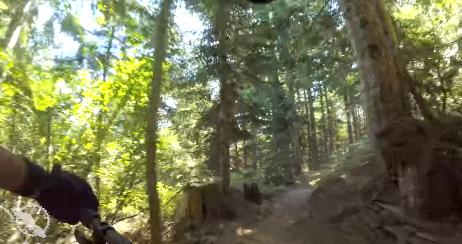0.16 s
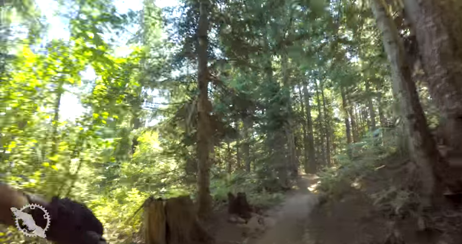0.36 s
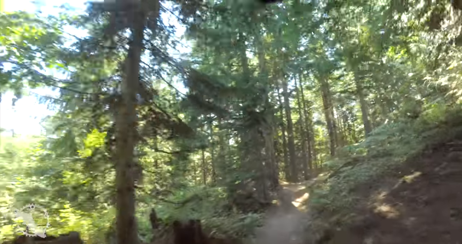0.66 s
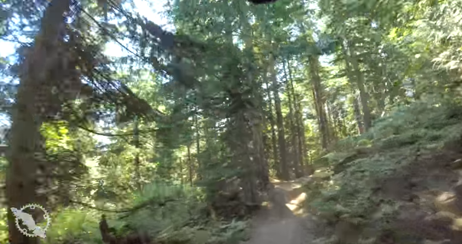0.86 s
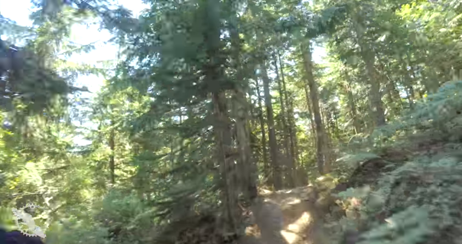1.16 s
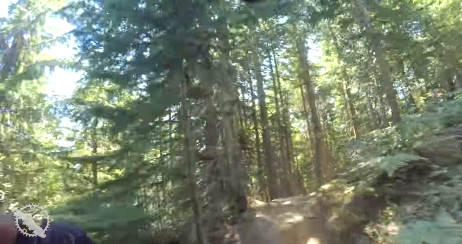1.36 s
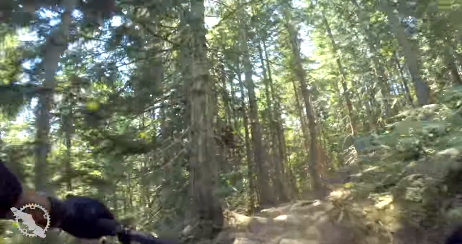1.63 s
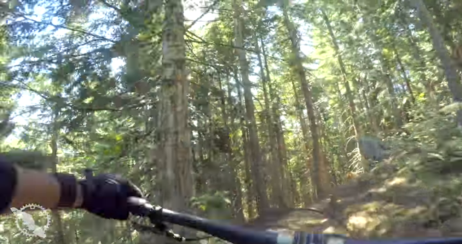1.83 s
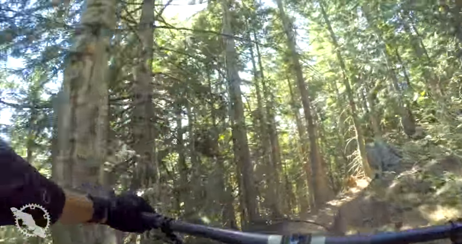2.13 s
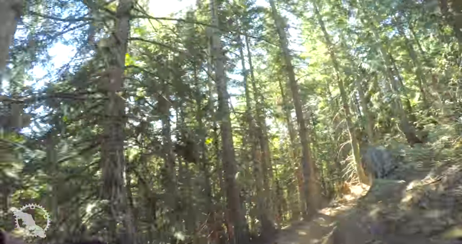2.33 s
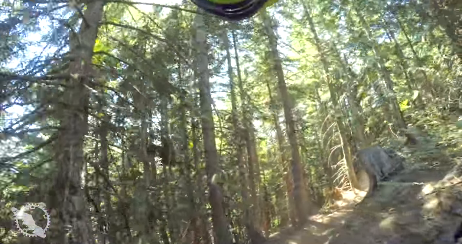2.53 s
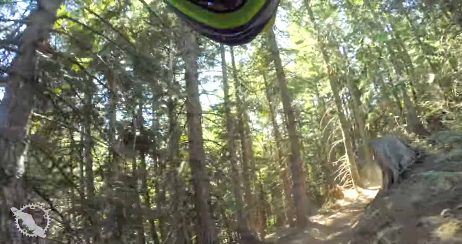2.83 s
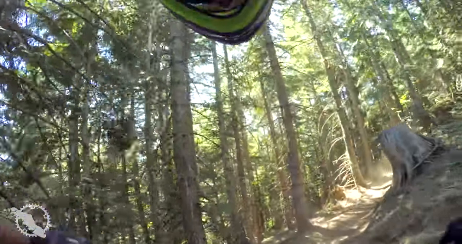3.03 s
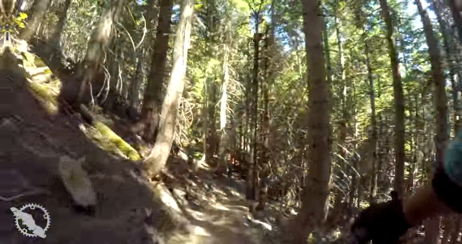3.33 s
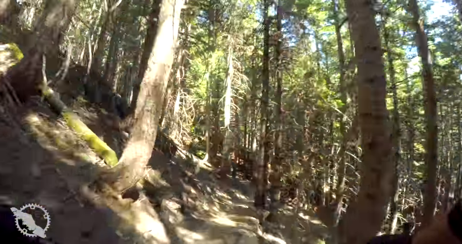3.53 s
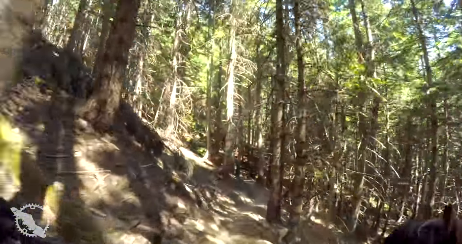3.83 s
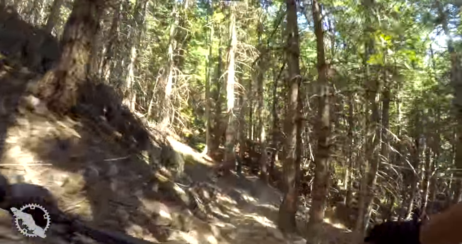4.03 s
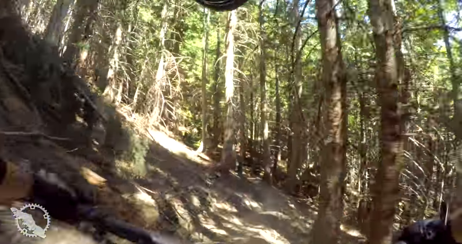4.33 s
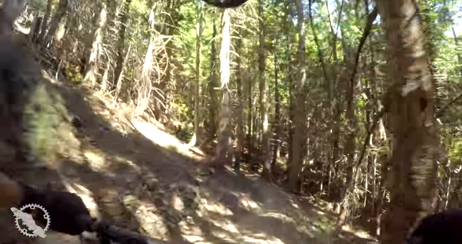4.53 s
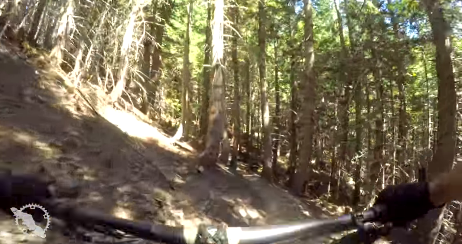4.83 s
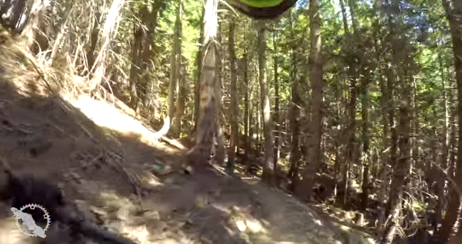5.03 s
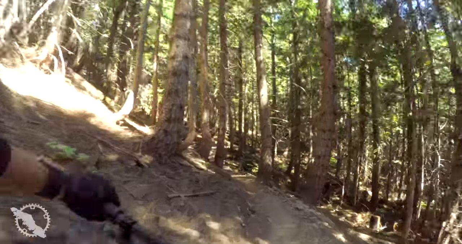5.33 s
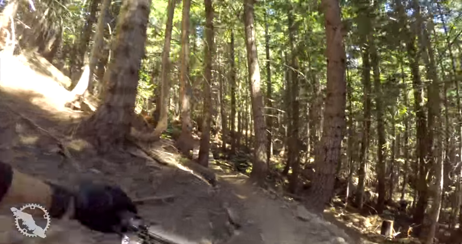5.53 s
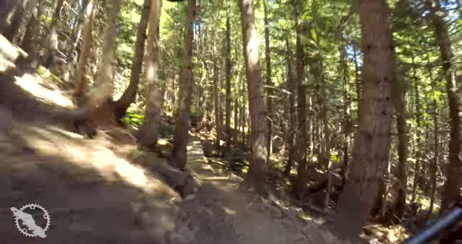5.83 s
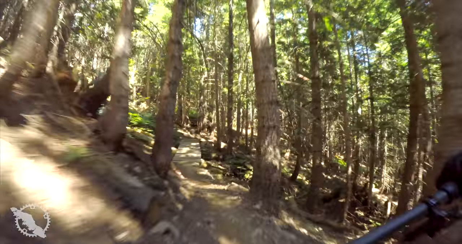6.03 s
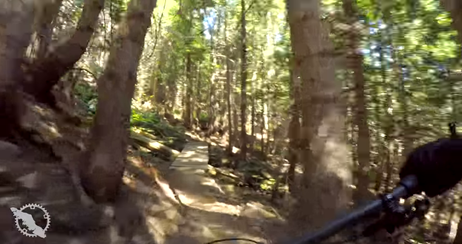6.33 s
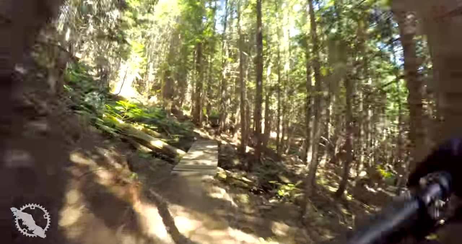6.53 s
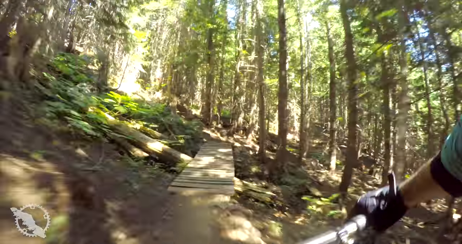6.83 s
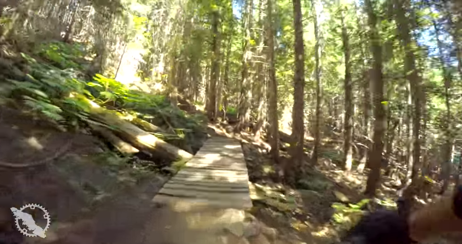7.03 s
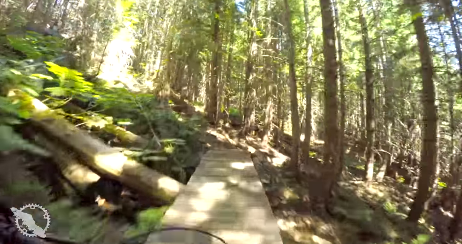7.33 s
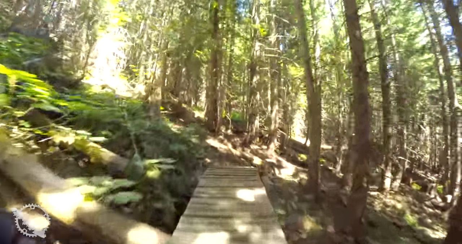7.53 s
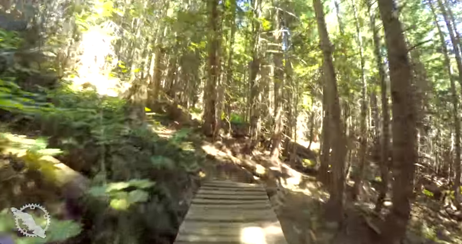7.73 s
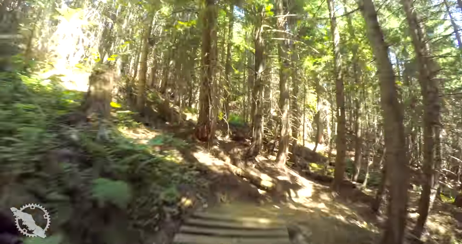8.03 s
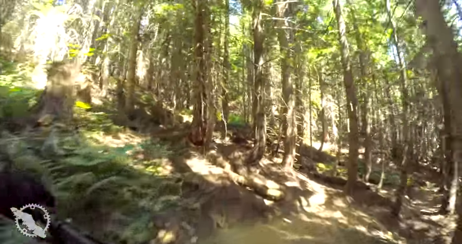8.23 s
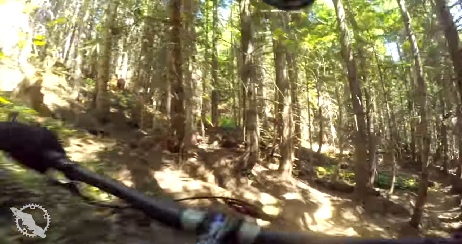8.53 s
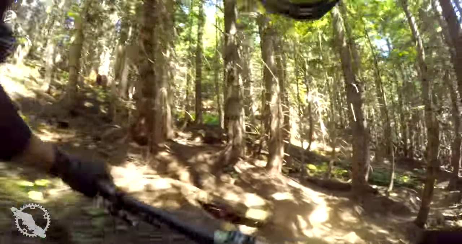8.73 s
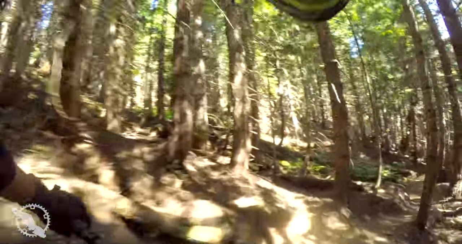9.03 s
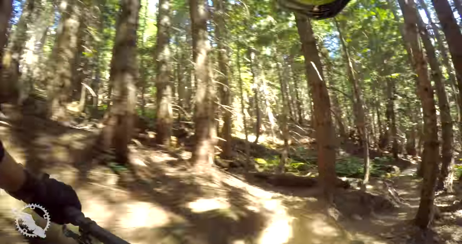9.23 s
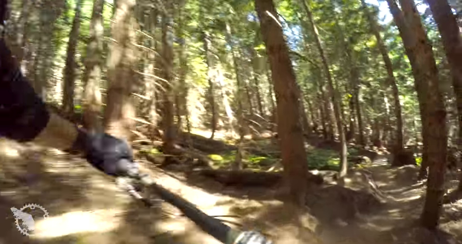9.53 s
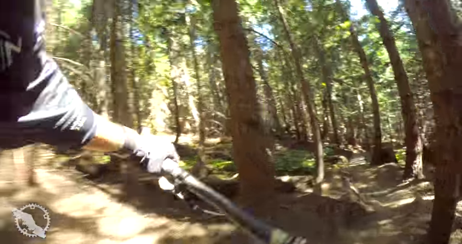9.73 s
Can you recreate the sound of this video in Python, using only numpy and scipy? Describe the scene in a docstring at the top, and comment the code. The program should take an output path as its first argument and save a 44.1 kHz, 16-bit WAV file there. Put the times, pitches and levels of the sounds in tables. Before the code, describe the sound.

A mountain bike coasts down a forest trail, heard close and dry in mono from a camera on the rider. A rapid, bright freehub buzz with fine hiss and faint disc ringing runs throughout. At first tyres crunch and growl on rough dirt, with thumps and chain clatter until about 1.1 s; then it is smoother, with knocks around 1.7-2.1 and 2.5-2.9 s. At 3.25 s the whirr jumps louder, and wind rumble swells near 3.7 s. From 4 to 6.4 s the ground is roughest: dense frame slaps, grit, hard thumps around 5 and 5.2 s, metallic pings. A calmer gap follows, then a jolt at 7.3 s and quick hollow plank knocks from 7.5 to 8.35 s. A heavy double bump lands near 8.7 s, then lighter dirt rolling, buzzing and a few knocks continue to the end, just under 10 s.

```python
"""Mountain bike coasting down a forest trail

Heard in mono from a camera worn by the rider. The freehub whirrs: noise gated by pawl drops rings hub and disc.
The tyres drum and crunch: random clicks ring casing and frame or are coloured as dirt and grit.
Roots and a plank bridge thump the wheels: short noise bursts and blows ring resonances and rock the camera.
Chain and cables clatter as banded bursts, spokes ping as decaying sines, tyres growl as gliding noise notes.
Wind buffets the microphone: low coloured noise of evened strength."""
import sys
import numpy as np
from scipy import signal
from scipy.fft import rfft, irfft, next_fast_len
from scipy.io import wavfile
from scipy.ndimage import uniform_filter1d, map_coordinates

SR = 44100
rng = np.random.default_rng(int(sys.argv[2]) if len(sys.argv) > 2 else 0)


def dump(signal):
    """Clip the signal to [-1, 1] and save it as 16-bit WAV at the path in sys.argv[1]."""
    limited = np.clip(np.atleast_2d(signal).T, -1, 1)
    pcm = np.round(limited * 32767).astype(np.int16)
    wavfile.write(sys.argv[1], SR, pcm)


N = 435708
CUTOFF_HZ = 15400   # top of the whole sound


def from_db(db):
    """Decibels to gain."""
    return 10 ** (np.asarray(db) / 20)


def rms_one(x):
    """Scale to unit power."""
    return x / np.sqrt(np.mean(x ** 2) + 1e-20)


def in_time(rows):
    """Draw each column of a breakpoint table as a curve with a value at every sample."""
    times, *columns = np.transpose(rows)
    return [np.interp(np.arange(N) / SR, times, column) for column in columns]


def drift(rate):
    """Smooth random wandering of rms 1; a higher rate wanders faster."""
    step = 40   # samples between computed points
    pole = np.exp(-2 * step * np.pi * rate / SR)
    noise = rng.standard_normal(N // step + 2002)
    slow = signal.lfilter([1], [1, -2 * pole, pole * pole], noise)[2000:]   # drop the start-up
    return np.interp(np.arange(N) / step, np.arange(len(slow)), rms_one(slow))


def arch(s, length):
    """A half-sine swell from 0 to 1 and back that starts at time s."""
    return np.sin(np.pi * np.clip((np.arange(N) / SR - s) / length, 0, 1))


def colour(x, spectrum):
    """Filter a steady sound with a spectral curve drawn over log frequency; rms 1."""
    hz, db = np.transpose(spectrum)
    size = next_fast_len(N)
    bins = np.maximum(np.fft.rfftfreq(size, 1 / SR), 1)
    gain = from_db(np.interp(np.log(bins), np.log(hz), db))
    return rms_one(irfft(rfft(x, size) * gain, size)[:N])


def resonate(x, hz, width):
    """One two-pole resonance with a gain of about 1 at its peak."""
    r = np.exp(-np.pi * width / SR)
    feedforward = np.array([1, 0, -1]) * (1 - r * r) / 2
    return signal.lfilter(feedforward, [1, -2 * r * np.cos(2 * np.pi * hz / SR), r * r], x)


def body(x, modes):
    """A struck object as resonances in parallel."""
    return sum(from_db(db) * resonate(x, hz, width) for hz, width, db in modes)


def band(x, low_hz, high_hz, order=1):
    """A band-pass, gentle at order 1."""
    high_hz = min(high_hz, CUTOFF_HZ)
    edges_hz = [min(low_hz, high_hz * .8), high_hz]
    return signal.sosfilt(signal.butter(order, edges_hz, "band", fs=SR, output="sos"), x)


def edges(centre_hz, octaves):
    """Lower and upper edge of a band around a centre."""
    return centre_hz * 2 ** (-octaves / 2), centre_hz * 2 ** (octaves / 2)


def grains(per_s, spread_db):
    """Random clicks of either sign whose sizes scatter exponentially in dB; rms 1."""
    out = np.zeros(N)
    when, size, sign = rng.random((max(int(per_s * N / SR), 1), 3)).T
    size_db = spread_db * np.minimum(-np.log(1 - size), 4)
    out[(when * N).astype(int)] = np.sign(sign - .5) * from_db(size_db)
    return rms_one(out) + 1e-18


def add(out, s, sound, peak_db):
    """Mix a short sound in at time s with the given peak."""
    i = int(np.clip(s * SR, 0, N - 1))
    out[i:i + len(sound)] += (from_db(peak_db) * sound / np.abs(sound).max())[:N - i]


# coasting rear hub; whirr and hiss are abruptly louder from 3.25 s:
# [t/s, whirr level/dB, fine hiss level/dB], before trims
HUB_LEVELS = [(0, -32.5, -39), (0.6, -36, -40.5), (1.25, -35.5, -38), (1.73, -33.5, -40.5),
              (2.3, -34.5, -45), (2.7, -35, -42.5), (3.23, -35, -46), (3.27, -31.5, -41.5),
              (3.95, -33, -40.5), (4.2, -32.5, -39), (5.6, -30, -36.5), (5.92, -31.5, -39),
              (6.8, -32.5, -39.5), (7.13, -32.5, -36.5), (7.5, -32.5, -44), (8.35, -34, -40.5),
              (8.63, -32, -42.5), (8.92, -31, -41), (9.88, -32, -40.5)]
# resonances of hub and spokes: [f/Hz, width/Hz, relative level/dB]
HUB_RESONANCES = [(1716, 140, 2.5), (2082, 186, 7.5), (2346, 96, 6.5), (2471, 214, 7), (2605, 63, -7),
                  (3430, 320, 0.5), (3990, 140, -8), (4480, 170, -6), (4785, 69, -1.5), (5150, 160, -1.5),
                  (5860, 150, -9.5), (6320, 200, -8), (7020, 120, -3.5), (7540, 140, -6), (8480, 200, -7.5)]
# resonances of the faintly ringing brake disc: [f/Hz, width/Hz, relative level/dB]
DISC_RESONANCES = [(3570, 62, 9), (3950, 150, -21), (4480, 80, -11), (5100, 160, -15)]
# now and then one hub or disc note swells: [start t/s, length/s, level at the top/dB, f/Hz]
HUB_AND_DISC_NOTES = [(0.05, .38, -46, 3540), (6.47, 0.11, -36, 2530), (6.92, 0.56, -39.5, 3530),
                      (7.04, 0.13, -34, 2510), (7.52, 0.63, -50, 3520), (9.253, 0.47, -41, 3590)]
# colour of the fine hiss: [f/Hz, relative level/dB]
HISS_SPECTRUM = [(5000, -13), (8500, 1), (10000, 4), (11300, 3.5), (12700, -1), (14200, 8), (15500, 0)]
# the pawls click faster as the hub grows louder
PAWLS_PER_S, PAWLS_PER_S_PER_DB = 300, 14.5
HUB_SWAY_DB, DISC_IDLE_DB = 1.8, -52   # random swing of each hub resonance; steady disc ring


def freehub(whirr_db, hiss_db, pace_db, jitter=.06, scrape_s=0.0037, ring_db=1.2, fizz_db=-1.5,
            flutter_db=1.0, swell_width_hz=90):
    """Pawls scrape and drop over the ratchet too fast to count, ringing hub, spokes and brake disc."""
    pawl_rate = (PAWLS_PER_S + PAWLS_PER_S_PER_DB * pace_db) * (1 + jitter * drift(40))
    teeth = np.cumsum(pawl_rate) / SR
    drops = np.diff(np.floor(teeth), prepend=0)
    contact = signal.lfilter([1], [1, -np.exp(-1 / (scrape_s * SR))], drops) + .5
    rasp = band(contact * rng.standard_normal(N), 950, CUTOFF_HZ, order=2)
    # each resonance wanders in level as the wheel turns behind the rider's legs
    whirr = rms_one(sum(from_db(db + HUB_SWAY_DB * drift(4.7)) * resonate(rasp, hz, width)
                        for hz, width, db in HUB_RESONANCES))
    disc = rms_one(body(rasp, DISC_RESONANCES))
    swells = sum(from_db(db) * arch(s, length) * rms_one(resonate(rasp, hz, swell_width_hz))
                 for s, length, db, hz in HUB_AND_DISC_NOTES)
    hiss = colour(rasp, HISS_SPECTRUM) * from_db(2.0 * drift(26))
    whirr_gain = from_db(whirr_db + ring_db + flutter_db * drift(33))
    return whirr_gain * whirr + from_db(DISC_IDLE_DB) * disc + swells + from_db(hiss_db + fizz_db) * hiss


GROUND_ECHO = .38   # echo gain relative to the direct sound


def off_the_ground(x, lag_s=0.0017, sway=0.223):
    """The hub is also heard off the trail; as the bike leans the detour changes and the colour shifts."""
    lag = SR * lag_s * np.exp(sway * drift(1.164))
    echo = map_coordinates(x, [np.arange(N) - lag], order=3)
    return (x + GROUND_ECHO * echo) / np.hypot(1, GROUND_ECHO)


# resonances of the tyre: [f/Hz, width/Hz, relative level/dB]
TYRE_RESONANCES = [(134, 72, 3), (236, 74, 3), (275.4, 23.5, 8), (365, 30, -13.5), (426, 44, -7),
                   (587, 33, -8)]
CASING_PIVOT_HZ = 200   # tyre resonances above this grow with the load, those below shrink


def casing(drum_db, firmness=0.14):
    """Knobs tap the tyre; the harder it is pressed, the more its upper resonances stand out."""
    taps = grains(1100, spread_db=2.5)
    pressed_db = drum_db - drum_db.mean()
    rings = 0
    for hz, width, db in TYRE_RESONANCES:
        tilt_db = firmness * pressed_db * np.log2(hz / CASING_PIVOT_HZ)
        rings = rings + from_db(db + tilt_db) * resonate(taps, hz, width)
    return rms_one(band(rings, 69, 677, order=2))


def pebbles(per_s=10, width_hz=170):
    """Small stones tick against tread and rim, each size at a pitch of its own."""
    pitches = np.geomspace(1900, 9000, num=14)
    return rms_one(sum(resonate(grains(per_s, spread_db=-0.5), hz, width_hz) for hz in pitches))


# tyres on the ground: [t/s, casing drum level/dB, dirt scrub level/dB], before trims and load
TRAIL_LEVELS = [(0, -25, -35), (0.3, -34, -38), (0.48, -36.5, -43), (0.93, -32, -39.5), (1.28, -42.5, -47),
                (1.74, -33.5, -39), (2.38, -47, -50), (2.72, -46.5, -47.5), (2.95, -36.5, -42.5),
                (3.95, -37.5, -42), (4.15, -32, -38), (4.45, -29.5, -37), (4.9, -34, -37.5),
                (5.35, -29.5, -35.5), (5.95, -33.5, -39), (6.38, -29, -37), (6.8, -40, -48.5),
                (7.15, -33, -41), (7.6, -33, -40.5), (8.3, -31.5, -39.5), (8.55, -37, -43.5),
                (8.88, -39, -43), (9.55, -34.5, -37.5), (9.88, -36.5, -41)]
# the tyres slide a little and throw more grit: [start t/s, length/s, rise/dB]
GRIT_SPRAYS = [(-0.15, 0.59, 2.5), (1.59, 0.36, 4.5), (7.002, 0.32, 1), (9.3, 0.44, 2.5)]
# colour of scrubbed dirt: [f/Hz, relative level/dB]
SCRUB_SPECTRUM = [(200, 25), (450, 1), (750, 4), (1100, 13.5), (1600, 7), (2600, -5), (4500, 10),
                  (9000, -51)]
# colour of cracking grit: [f/Hz, relative level/dB]
GRIT_SPECTRUM = [(900, -41), (1800, 3), (3000, -1), (4200, -6), (5500, -2), (7600, -1.5), (9000, -14.5),
                 (12000, -9), (16000, -18)]
# resonances of the frame: [f/Hz, width/Hz, relative level/dB]
FRAME_RESONANCES = [(630, 18, -2), (891, 157, 5.5), (1113, 260, -4), (1372, 86, 2.5), (1630, 380, -4.5),
                    (1970, 310, -5), (2500, 210, 2.5), (3200, 160, 2)]
# grit sprays with rough ground and with pace: base level, and dB per dB of each
GRIT_DB, GRIT_FOLLOWS_GROUND, GRIT_FOLLOWS_PACE = -35.5, 0.072, 0.48


def tyres(drum_db, scrub_db, pace_db, dirt_db=-0.3, rattle_db=1.5, uneven_db=1.72, bounce_db=2.0):
    """Knobs drum the casing, dirt scrubs and shakes the frame, grit cracks; all follow a random load."""
    load_db = uneven_db * drift(28)
    rough_db = scrub_db - scrub_db.mean()
    drum = from_db(drum_db + bounce_db * drift(28)) * casing(drum_db)
    dirt = colour(grains(1800, spread_db=7.5), SCRUB_SPECTRUM)
    rattle = rms_one(body(grains(500, spread_db=2.5), FRAME_RESONANCES)) * from_db(rattle_db)
    scrub = from_db(scrub_db + dirt_db) * (dirt + rattle)
    grit = colour(grains(4000, spread_db=0.9), GRIT_SPECTRUM) + from_db(-11.5) * pebbles()
    grit_db = GRIT_DB + GRIT_FOLLOWS_GROUND * rough_db + GRIT_FOLLOWS_PACE * pace_db + 0.91 * drift(61)
    grit_db = grit_db + sum(db * arch(s, length) for s, length, db in GRIT_SPRAYS)
    return from_db(load_db) * (drum + scrub + from_db(grit_db) * grit)


def gravel(rough_db, per_s=70, crowding=2.0, peak_db=-23.0, range_db=7, follows=0.28, tick_s=0.001,
           low_hz=1100, high_hz=5500):
    """Single stones snap out from under the tread, more often and harder on rough ground."""
    out, t = np.zeros(N), np.arange(SR // 80) / SR
    rate = per_s * from_db(crowding * rough_db)
    when, strength, pitch, keep = rng.random((1500, 4)).T   # candidates, thinned to the rate below
    cracks = rng.standard_normal((len(when), len(t))) * np.exp(-t / tick_s)
    i = (when * N).astype(int)
    for k in np.flatnonzero(keep < rate[i] * N / SR / len(when)):
        hz = low_hz * (high_hz / low_hz) ** pitch[k]
        stone_db = peak_db + follows * rough_db[i[k]] + range_db * (strength[k] - .5)
        add(out, i[k] / SR, resonate(cracks[k], hz, .5 * hz), stone_db)
    return out


# a tyre growls as it slips or rings on after a landing:
# [start t/s, length/s, level before level_db and swell/dB, first pitch f/Hz, last pitch f/Hz]
TYRE_GROWLS = [(0.15, 0.12, -26.5, 376, 521), (0.241, 0.13, -32.5, 493, 577), (0.55, 0.31, -37, 754, 712),
               (2.9, 0.066, -36, 315, 295), (5.239, 0.09, -26, 330, 290), (6.926, 0.46, -37.5, 448.5, 437),
               (8.11, 0.33, -34.5, 363, 349), (9.7, 0.078, -32, 624, 720)]


def growls(width_hz=75, level_db=-2.0):
    """A slipping or ringing tyre growls: a rough note of narrow noise that swells, glides and fades."""
    out, t = np.zeros(N), np.arange(N) / SR
    lowpass = signal.butter(2, width_hz, fs=SR, output="sos")
    # two slow noises on cosine and sine make a narrow band of noise around the pitch
    real, imaginary = rms_one(signal.sosfilt(lowpass, rng.standard_normal((2, N))))
    for s, length, db, first_hz, last_hz in TYRE_GROWLS:
        during = (t >= s) & (t < s + length)
        progress = (t[during] - s) / length
        phase = 2 * np.pi * np.cumsum(first_hz + (last_hz - first_hz) * progress) / SR
        growl = real[during] * np.cos(phase) + imaginary[during] * np.sin(phase)
        out[during] += from_db(db + level_db) * np.sin(np.pi * progress) * growl
    return out


# a wheel meets a root, stone or ledge: [t/s, thump peak level before level_db/dB, thump centre f/Hz,
# rise/s, t60/s, camera rocking peak level/dB, rocking f/Hz]
WHEEL_BUMPS = [(0.007, -20, 292, .0014, 0.09, -24, 46), (0.069, -22, 288, .0014, .06, -38, 45),
               (0.218, -16, 323, 0.0024, .06, -19, 44), (0.58, -23, 170, .002, .06, -24, 55),
               (0.674, -21, 218, .003, .07, -17, 48), (0.729, -15.5, 130, 0.0022, 0.072, -7, 55.6),
               (0.836, -19, 230, 0.0018, 0.063, -11, 35), (0.955, -18.5, 169, .002, 0.12, -12.5, 55.4),
               (1.051, -18, 382, .002, 0.07, -18, 65), (1.707, -23, 141, 0.0018, 0.049, -31, 45),
               (1.802, -26, 225, .0014, .066, -32, 45), (2.018, -22.5, 228, 0.0016, 0.13, -25, 51),
               (2.255, -30, 200, .003, 0.073, -16, 31), (2.497, -15, 177, 0.0022, 0.058, -9, 58),
               (2.565, -25, 190, .002, .07, -19.5, 65), (2.618, -27, 240, .002, .045, -32, 45),
               (2.736, -32, 105, .002, 0.058, -17, 39.7), (2.872, -20, 400, 0.0016, 0.037, -15, 54.3),
               (2.882, -18.5, 420, 0.0009, 0.039, -16, 78), (3.097, -21, 287, 0.0034, 0.056, -18.5, 48.7),
               (3.35, -24, 270, 0.0028, 0.079, -17, 50.7), (3.664, -21, 170, 0.0018, 0.045, -22, 38),
               (4.307, -24, 299, .002, .06, -23, 45), (4.455, -19, 160, 0.0022, .06, -15, 65),
               (4.705, -23, 260, .002, .066, -7, 55.4), (4.961, -21, 555, .0014, 0.12, -5, 39),
               (5.026, -16, 387, 0.0012, 0.048, -9, 34), (5.228, -7.5, 378, 0.0011, 0.022, -20, 45),
               (5.243, -17, 169, .002, .06, -20, 45), (5.423, -18, 328, 0.0022, 0.074, -12, 47),
               (5.485, -15.5, 264, 0.0028, .066, -16, 30), (5.627, -16.5, 504, 0.0028, 0.081, -17, 35.3),
               (5.808, -20, 567, 0.0018, 0.069, -17, 40.6), (6.016, -42, 250, .002, .066, -16.5, 60.5),
               (6.164, -21, 314, .002, 0.086, -18, 45), (6.219, -18, 287, 0.0016, 0.054, -30, 45),
               (6.341, -14.5, 298, .0014, 0.078, -12, 48), (6.375, -20, 400, .002, 0.078, -15.5, 33),
               (7.281, -24, 476, .0014, 0.032, -32, 45), (7.326, -16.5, 470, .0014, .05, -12, 32),
               (7.364, -18, 323, 0.0025, 0.054, -20, 45.3), (8.255, -27, 200, .002, .06, -18, 75),
               (8.539, -28, 283, .002, .066, -26, 45), (8.614, -39, 160, .002, .066, -11.5, 35.3),
               (8.676, -18, 240, 0.0037, 0.11, -6, 45.7), (8.731, -17.5, 260, 0.0017, 0.047, -12, 34.3),
               (8.97, -18.5, 404, 0.0015, 0.06, -21, 45.3), (8.986, -21, 303, 0.002, 0.08, -24, 44.7),
               (9.595, -23, 290, .002, 0.055, -32, 45), (9.741, -26, 557, 0.0022, 0.073, -31, 45),
               (9.786, -33, 247, .002, .066, -17.5, 58)]
THUMP_OCTAVES = 1.4   # bandwidth of the shudder
ROCK_SWELL_CYCLES = 0.52   # the camera rocks on its mount: cycles to the widest swing
TYRE_AIR_HZ = 289   # note of the air inside a struck tyre


def bumps(tail_db=-15.0, tail_t60=0.38, hum_db=-18, hum_t60=0.18, squash_db=3.5, squash_s=0.002, ring_db=-6.0,
          level_db=1.5, top_hz=1150, boom_db=-8.5, boom_hz=96, boom_t60=0.16):
    """A squashed tyre pushes and shudders, ringing casing and frame; wheel booms, air hums, camera rocks."""
    out, t = np.zeros(N), np.arange(SR // 4) / SR
    for s, db, hz, rise_s, t60, rock_db, rock_hz in WHEEL_BUMPS:
        rise = 1 - np.exp(-t / rise_s)
        shudder = rms_one(band(rng.standard_normal(len(t)), *edges(hz, THUMP_OCTAVES)))
        shudder = shudder * (from_db(-60 * t / t60) + from_db(tail_db - 60 * t / tail_t60))
        squash = np.e * t / squash_s * np.exp(-t / squash_s) * np.sin(2 * np.pi * hz * t)
        push = band((shudder + from_db(squash_db) * squash) * rise, 46, top_hz, order=2)
        ringing = body(push, TYRE_RESONANCES + FRAME_RESONANCES)
        add(out, s, push + from_db(ring_db) * ringing, db + level_db)
        boom = rise * from_db(-60 * t / boom_t60) * np.sin(2 * np.pi * boom_hz * t)
        add(out, s, boom, (db + rock_db) / 2 + boom_db)
        hum = rise * from_db(-60 * t / hum_t60) * np.sin(2 * np.pi * TYRE_AIR_HZ * t)
        add(out, s, hum, db + hum_db)
        swings = rock_hz * t
        rocking = swings * np.exp(-swings / ROCK_SWELL_CYCLES) * np.sin(2 * np.pi * swings)
        add(out, s, rocking, rock_db)
    return out


# the wheels cross the plank bridge:
# [t/s, peak level before level_db/dB, lowest note f/Hz, brightness/dB per octave]
PLANK_HITS = [(7.518, -17, 290, 6), (7.552, -15.5, 272, -4), (7.600, -21, 285, -5),
              (7.700, -17.5, 241, -11), (7.718, -26, 332, 6), (7.743, -18, 244, -4), (7.818, -21, 357, 16),
              (7.838, -20, 410, 6), (7.853, -26, 298, 12), (7.933, -21, 275, -4), (7.980, -21, 320, -4),
              (8.060, -14.5, 307, 4), (8.085, -15.5, 350, 3), (8.097, -21, 238, 11), (8.139, -24, 302, 1),
              (8.187, -31, 291, -8), (8.231, -22, 330, -9), (8.344, -24, 283, 0)]
# a plank rings with: [multiple of its lowest note, width/Hz, relative level before brightness/dB]
PLANK_RESONANCES = [(1, 36, 9.5), (1.42, 50, -3.5), (2.02, 60, -9), (2.66, 76, -22)]


def planks(contact_s=0.014, rise_s=0.0023, chatter_db=-10, level_db=-2.0):
    """A wheel drops on a loose plank, which knocks hollowly and chatters on its beam."""
    out, t = np.zeros(N), np.arange(SR // 5) / SR
    for s, db, hz, bright_db in PLANK_HITS:
        chatter = rng.standard_normal(len(t)) * np.exp(-t / contact_s) * (1 - np.exp(-t / rise_s))
        blow = from_db(chatter_db) * chatter
        blow[0] += 1
        modes = [(hz * ratio, width, mode_db + bright_db * np.log2(ratio))
                 for ratio, width, mode_db in PLANK_RESONANCES]
        add(out, s, band(body(blow, modes), 140, 850, order=2), db + level_db)
    return out


# chain, cables and stones hit the frame hard:
# [t/s, level of the whole slap's energy over 10 ms/dB, lower edge f/Hz, upper edge f/Hz, t60/s]
FRAME_SLAPS = [(0.026, -23.5, 2040, 7800, 0.036), (0.036, -31, 3000, 8000, 0.025),
               (0.051, -25.0, 1910, 3000, 0.019), (0.106, -32, 1020, 6400, 0.021),
               (0.119, -29, 830, 7900, 0.023), (0.22, -29.5, 1400, 6900, 0.028),
               (0.26, -29.0, 1630, 6900, 0.022), (0.295, -32, 3500, 8500, 0.04),
               (0.315, -27, 1530, 6700, 0.036), (0.362, -23.5, 1990, 6100, 0.026),
               (0.454, -27.5, 1520, 8700, 0.024), (0.522, -30, 1410, 5300, 0.026),
               (0.681, -28.5, 1780, 5200, 0.026), (0.728, -25.5, 1300, 6200, 0.032),
               (0.797, -26.5, 2690, 8700, 0.038), (0.834, -26.5, 1330, 6100, 0.028),
               (0.852, -27, 1780, 8100, 0.026), (0.864, -30, 2130, 4400, 0.018),
               (0.896, -24.5, 2600, 7900, 0.025), (1.052, -30, 1350, 8100, 0.066),
               (1.547, -32.5, 1050, 7500, 0.026), (1.769, -21.5, 1650, 5200, 0.026),
               (1.815, -32, 960, 4700, 0.045), (1.89, -30.0, 2950, 7300, 0.026),
               (1.935, -25, 1460, 5700, 0.028), (2.004, -31.0, 2640, 7000, 0.026),
               (2.077, -24, 1270, 7500, 0.068), (2.29, -27.5, 1640, 6700, 0.033),
               (2.507, -28, 730, 3100, 0.026), (2.555, -19.5, 1940, 7360, 0.027),
               (2.746, -23.5, 1120, 3530, 0.02), (2.882, -35, 630, 2900, 0.026),
               (3.098, -28.5, 670, 3800, 0.026), (3.158, -29, 1860, 7400, 0.038),
               (3.348, -31, 940, 4000, 0.031), (3.541, -26.5, 1800, 8800, 0.072),
               (3.726, -23.5, 860, 4900, 0.071), (3.78, -23.0, 2230, 5200, 0.024),
               (3.901, -33, 1280, 4000, 0.026), (4.064, -24, 1140, 3700, 0.032),
               (4.115, -20, 2030, 7200, 0.023), (4.15, -27.0, 1670, 3600, 0.025),
               (4.168, -29.5, 1400, 4500, 0.022), (4.219, -23, 1940, 7300, 0.031),
               (4.291, -26, 850, 4100, 0.056), (4.333, -25.0, 840, 6400, 0.043),
               (4.399, -26, 1420, 5500, 0.03), (4.425, -28, 1750, 8400, 0.034),
               (4.505, -23.5, 950, 6800, 0.037), (4.519, -20.5, 2620, 7300, 0.036),
               (4.655, -24, 1000, 3400, 0.034), (4.717, -25.0, 1080, 6000, 0.054),
               (4.741, -24, 920, 7200, 0.025), (4.956, -20, 1510, 2700, 0.082),
               (4.963, -18, 1530, 3150, 0.027), (5.031, -18, 1040, 3600, 0.025),
               (5.118, -23.5, 1700, 7600, 0.03), (5.154, -29, 2230, 7500, 0.024),
               (5.201, -27.0, 2130, 6900, 0.023), (5.226, -23, 1500, 2600, 0.02),
               (5.231, -19.0, 840, 3300, 0.03), (5.246, -24.0, 2150, 4700, 0.044),
               (5.275, -26.0, 1470, 11000, 0.041), (5.312, -20, 1590, 8700, 0.028),
               (5.328, -24, 1040, 5100, 0.026), (5.425, -24.5, 740, 3100, 0.026),
               (5.437, -24, 800, 4600, 0.038), (5.472, -22.0, 1550, 7300, 0.025),
               (5.572, -27, 1760, 6600, 0.018), (5.62, -19, 1150, 2900, 0.062),
               (5.638, -21.0, 1130, 6600, 0.029), (5.674, -23.0, 2080, 4400, 0.023),
               (5.706, -26, 1580, 7000, 0.046), (5.813, -26.0, 630, 4000, 0.026),
               (5.83, -24, 2700, 5400, 0.032), (5.954, -37, 1020, 6800, 0.026),
               (5.992, -29, 1080, 2900, 0.026), (6.163, -19.0, 1010, 3700, 0.043),
               (6.346, -22, 1280, 3700, 0.055), (6.354, -21.5, 930, 2300, 0.025),
               (6.384, -22, 1460, 2880, 0.055), (6.46, -22.5, 1590, 3800, 0.021),
               (6.886, -28.5, 890, 7000, 0.026), (6.918, -30, 2500, 3900, 0.04),
               (7.282, -35, 630, 2800, 0.026), (7.328, -22.5, 770, 3300, 0.056),
               (7.336, -24, 2100, 4500, 0.03), (7.344, -20.5, 2650, 7400, 0.04),
               (7.369, -30, 500, 1700, 0.04), (7.385, -25, 2720, 4460, 0.022),
               (7.392, -22.5, 2080, 6200, 0.038), (7.536, -29, 1030, 4400, 0.024),
               (7.569, -31, 720, 4300, 0.026), (7.638, -34, 1040, 6900, 0.026),
               (7.676, -30, 1980, 6400, 0.026), (7.715, -22.5, 1870, 4700, 0.024),
               (7.762, -33, 1980, 4300, 0.025), (7.808, -26.0, 2900, 5500, 0.03),
               (7.815, -21.5, 2450, 9200, 0.037), (7.87, -28.0, 2900, 4600, 0.025),
               (7.877, -27.0, 2650, 9300, 0.028), (7.911, -26.5, 2020, 6400, 0.024),
               (7.953, -28.0, 1930, 5100, 0.032), (8.058, -24, 1520, 6700, 0.04),
               (8.09, -27, 1380, 6900, 0.031), (8.127, -28, 1750, 5400, 0.025),
               (8.472, -28, 2950, 9100, 0.066), (8.494, -30, 1090, 7800, 0.026),
               (8.546, -27.0, 1520, 5100, 0.037), (8.68, -25, 840, 3500, 0.046),
               (8.69, -27, 1190, 4830, 0.028), (8.727, -18.5, 1510, 6700, 0.041),
               (8.795, -28, 1980, 3200, 0.027), (8.971, -31, 1080, 4400, 0.026),
               (9.089, -38, 1740, 5700, 0.027), (9.168, -32.0, 730, 1700, 0.026),
               (9.399, -30.0, 840, 6600, 0.026), (9.592, -23.5, 840, 2900, 0.025)]
BRUSH_RISE_S = .003   # how fast loose links build up ahead of a slap


def clatter(slaps, brush=0.5, crack_db=-12.5, crack_s=0.00066, link_width_hz=130, dull_db=2.0):
    """Each slap is a crack and a dying shiver of links, in a band of its own; the frame rings along."""
    out, t = np.zeros(N), np.arange(SR // 10) / SR
    lead_s, measure_s = .014, .01
    after = np.maximum(t - lead_s, 0)
    # loose links brush the tube just before the main weight lands
    landing = np.exp(np.minimum(t - lead_s, 0) / BRUSH_RISE_S) * np.where(t < lead_s, brush, 1)
    crack = from_db(crack_db) * np.exp(-after / crack_s) * (t >= lead_s)
    for s, db, low_hz, high_hz, t60 in slaps:
        force = rng.choice([-1, 1], len(t)) * landing * (from_db(-60 * after / t60) + crack)
        dull = band(force, 0.69 * low_hz, 1.3 * low_hz)
        links = band(force, low_hz, high_hz, order=2) + from_db(dull_db - 6.5) * dull
        # every spot that is struck has a few short notes of its own
        notes = low_hz * (high_hz / low_hz) ** ((np.arange(3) + rng.random(3)) / 3)
        slap = links + body(links, [(hz, link_width_hz, 0) for hz in notes]) + body(links, FRAME_RESONANCES)
        # peak relative to the slap's energy spread over 10 ms
        crest_db = 10 * np.log10(np.max(slap ** 2) * measure_s * SR / np.sum(slap ** 2))
        add(out, s - lead_s, slap, db + crest_db)
    return out


# small random chain slaps: base level, its range, dB per dB of ground roughness
SLAP_DB, SLAP_RANGE_DB, SLAP_FOLLOWS_GROUND = -34.5, 5, 0.53
SLAP_LOW_HZ, SLAP_HIGH_HZ = 1850, 5000   # range of their centres
SLAP_OCTAVES, SLAP_T60_S = 1.28, 0.011   # bandwidth and decay


def small_slaps(scrub_db, count=45):
    """Between the big slaps the chain ticks at random, more often and harder on rough ground."""
    when, strength, pitch = rng.random((count, 3)).T
    # equal shares of the total shaking hold one slap each
    shaking = np.cumsum(from_db(scrub_db) ** 2)
    i = np.searchsorted(shaking, shaking[-1] * (np.arange(count) + when) / count).clip(0, N - 1)
    rough_db = scrub_db[i] - scrub_db.mean()
    db = SLAP_DB + SLAP_FOLLOWS_GROUND * rough_db + SLAP_RANGE_DB * (strength - .5)
    centre_hz = SLAP_LOW_HZ * (SLAP_HIGH_HZ / SLAP_LOW_HZ) ** pitch
    low_hz, high_hz = edges(centre_hz, SLAP_OCTAVES)
    return list(zip(i / SR, db, low_hz, high_hz, np.full(count, SLAP_T60_S)))


# a short metallic ping, as of a spoke or tube: [t/s, peak level/dB, f/Hz]
METAL_PINGS = [(0.050, -23, 2450), (2.745, -26, 1360), (3.846, -20.5, 1330), (4.954, -13, 2186),
               (4.958, -16, 870), (4.961, -19, 2360), (5.028, -20, 1306), (5.244, -22, 2650),
               (6.161, -21, 1270), (6.163, -20, 1580), (6.352, -24, 1324)]
PING_T60_S = 0.035


def pings():
    """A struck spoke or tube sounds one short note: a sine with a soft onset and a quick decay."""
    out, t = np.zeros(N), np.arange(SR // 8) / SR
    envelope = (1 - np.exp(-t / 0.0031)) * from_db(-60 * t / PING_T60_S)
    for s, db, hz in METAL_PINGS:
        add(out, s, envelope * np.sin(2 * np.pi * hz * t), db)
    return out


# air on the microphone: [t/s, buffeting level before gain_db/dB]
WIND_LEVELS = [(0.0, -32), (0.6, -33.5), (0.91, -26), (1.13, -34), (1.32, -35.5), (1.73, -26.5),
               (2.23, -36.5), (2.64, -36), (3.11, -38), (3.71, -20.5), (3.99, -25.5), (4.46, -23),
               (4.62, -23.5), (6.52, -25), (6.85, -26), (6.98, -26.5), (7.75, -27), (8.67, -29),
               (9.03, -31.5), (9.88, -27)]
# colour of the buffeting, before its strength is evened: [f/Hz, relative level/dB]
WIND_SPECTRUM = [(10, -20), (18, 4.5), (26, 0.5), (36, 1.5), (48, 0.5), (70, -6), (100, -13), (150, -27.5),
                 (300, -31), (1000, -62)]


def wind(level_db, gain_db=3.0):
    """Eddies push on the microphone port one after another, at fairly even strength."""
    eddies = colour(rng.standard_normal(N), WIND_SPECTRUM)
    power = uniform_filter1d(eddies ** 2, SR // 8) + 1e-6
    return from_db(level_db + gain_db) * rms_one(eddies / np.sqrt(power))


def scene():
    """Bike and wind travel with the microphone, the same in both channels."""
    drum_db, scrub_db = in_time(TRAIL_LEVELS)
    whirr_db, hiss_db = in_time(HUB_LEVELS)
    pace_db = hiss_db - hiss_db.mean()   # the faster the wheel, the louder the hub
    rolling = tyres(drum_db, scrub_db, pace_db) + gravel(scrub_db - scrub_db.mean()) + growls()
    hub = off_the_ground(freehub(whirr_db, hiss_db, pace_db))
    knocks = bumps() + planks() + clatter(small_slaps(scrub_db) + list(FRAME_SLAPS)) + pings()
    mono = wind(*in_time(WIND_LEVELS)) + rolling + hub + knocks
    return np.array([mono, mono])


def record(dry):
    """The highest peaks are clipped, then a steep low-pass cuts the top."""
    lowpass = signal.ellip(12, .1, 90, CUTOFF_HZ, fs=SR, output="sos")
    return signal.sosfilt(lowpass, np.clip(dry, -.88, .88))


dry = scene()
out = record(dry)
dump(out)
```